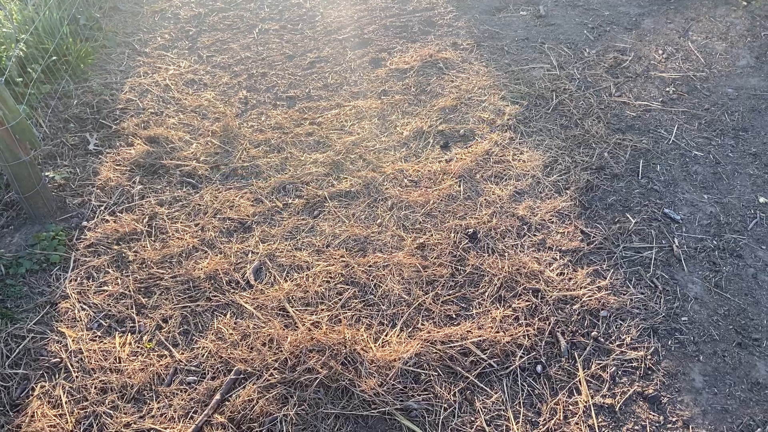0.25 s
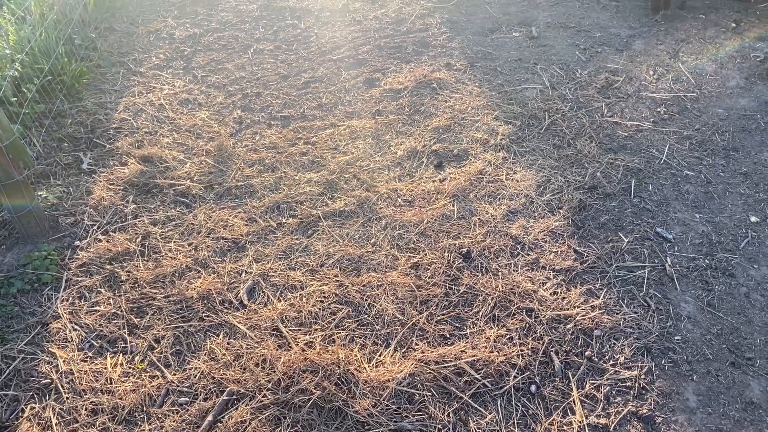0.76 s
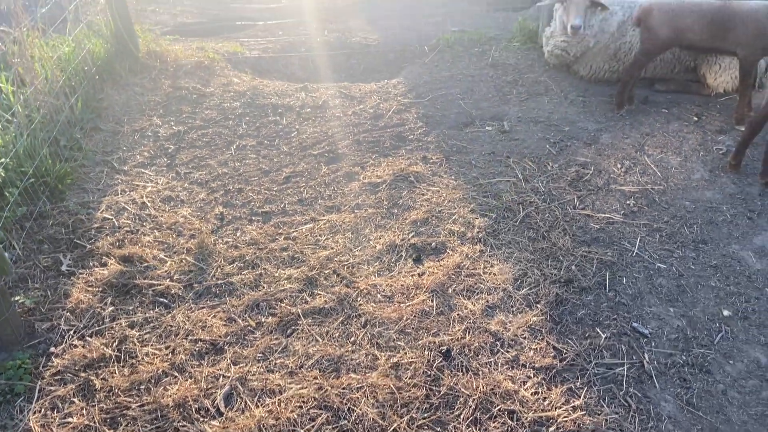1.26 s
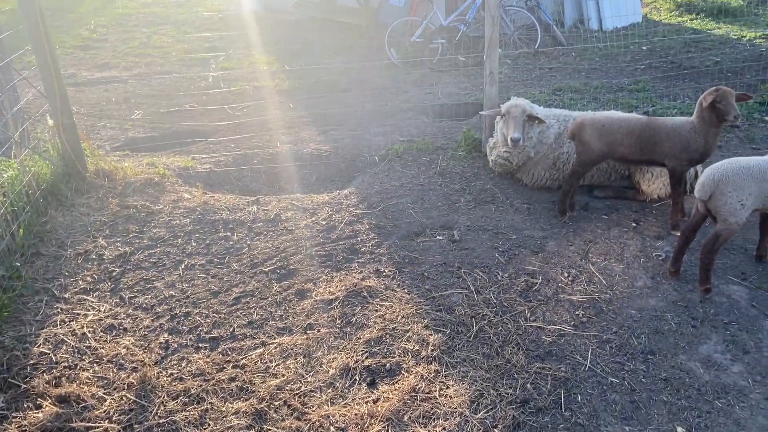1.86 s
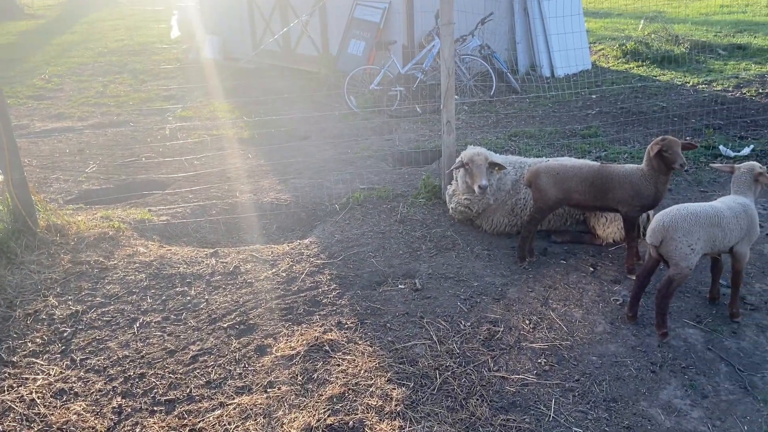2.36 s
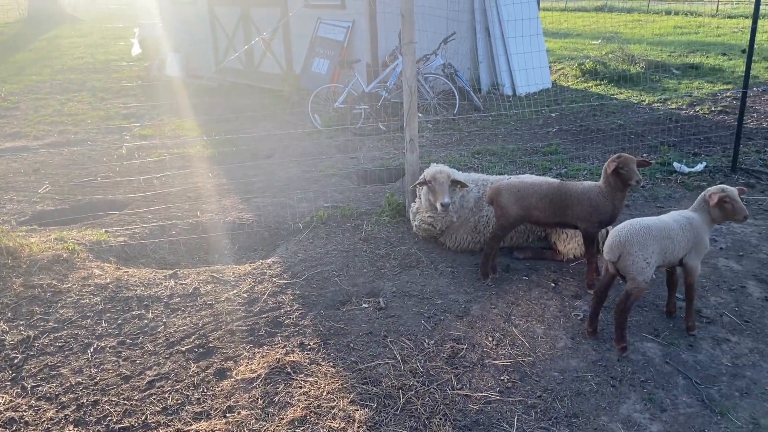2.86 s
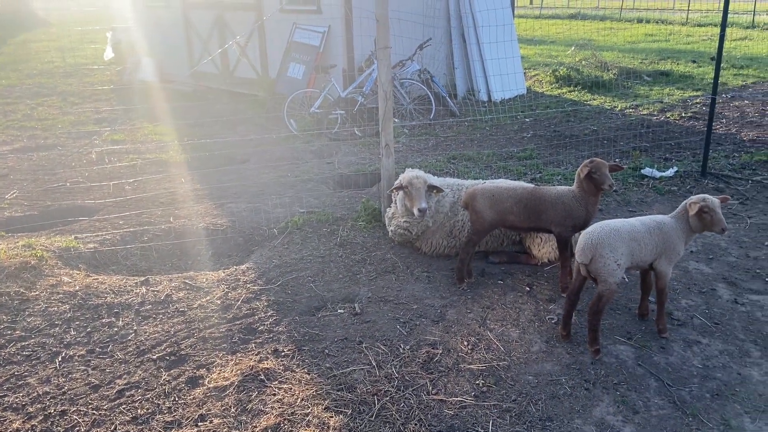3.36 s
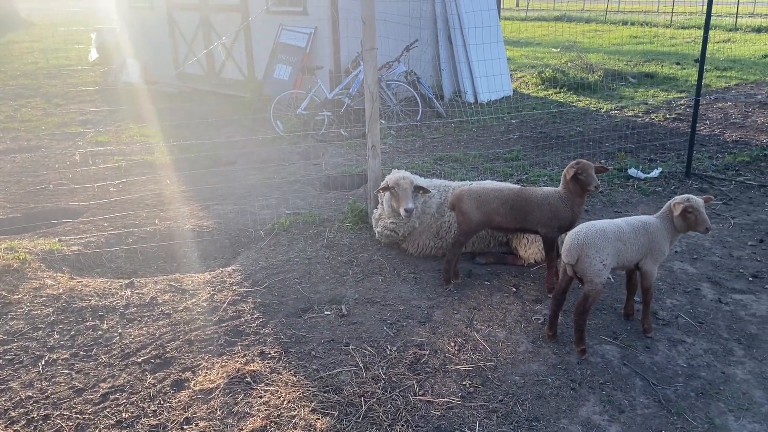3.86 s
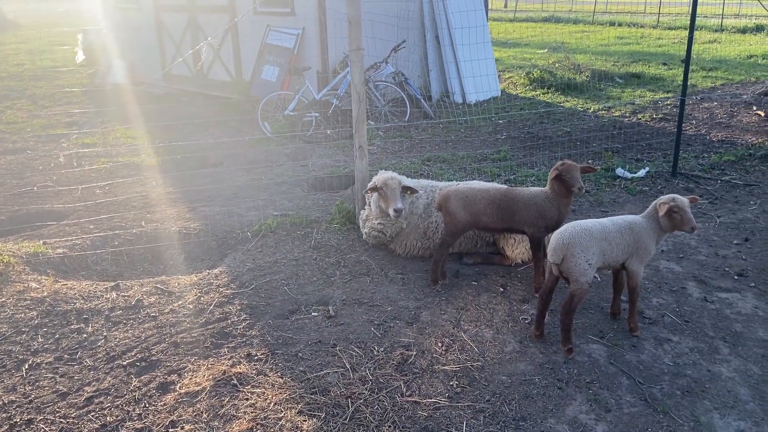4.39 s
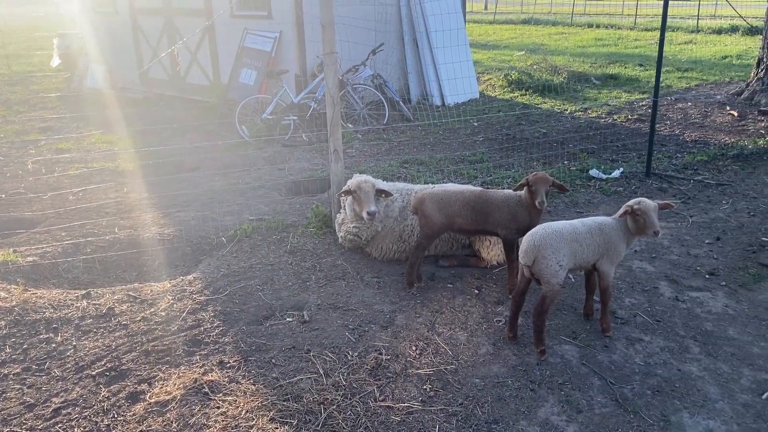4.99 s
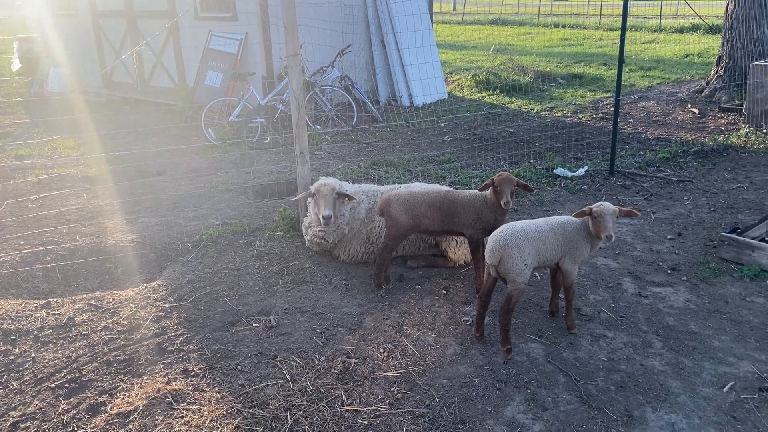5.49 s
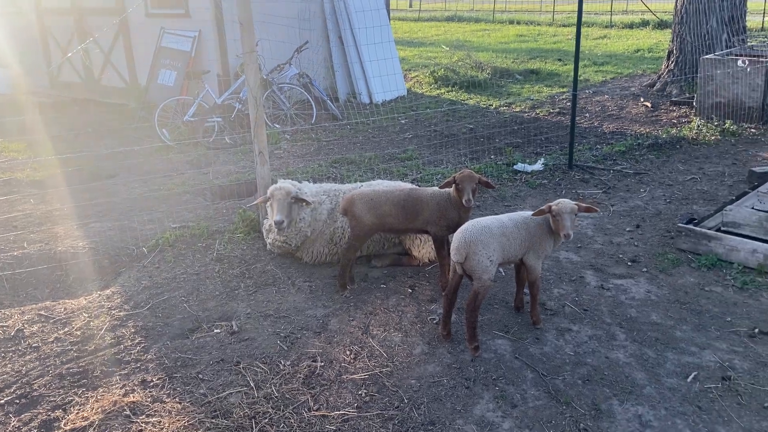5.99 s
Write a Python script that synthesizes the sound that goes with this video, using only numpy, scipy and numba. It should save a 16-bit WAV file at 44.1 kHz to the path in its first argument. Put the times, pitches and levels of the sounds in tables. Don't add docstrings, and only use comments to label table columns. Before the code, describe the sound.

Gusty low wind over faint distant hiss and tiny straw ticks, three hoarse dog barks with echoes, and finally a close, raspy, quavering sheep bleat.

```python
import sys
import numpy as np
from scipy import signal
from scipy.fft import rfft, irfft, next_fast_len
from scipy.io import wavfile
from scipy.ndimage import uniform_filter1d, minimum_filter1d
from numba import njit

SR = 44100
rng = np.random.default_rng(int(sys.argv[2]) if len(sys.argv) > 2 else 0)


def gain_from_db(level_db):
    decades = np.asarray(level_db, float) / 20
    return 10 ** decades


def waveform_to_disk(signal):
    frames = np.transpose(np.atleast_2d(signal))
    scaled = np.clip(frames, -1, 1) * 32767
    samples = np.round(scaled).astype(np.int16)
    wavfile.write(sys.argv[1], SR, samples)


N = 275090
T = np.arange(N) / SR
SIZE = next_fast_len(N)
HZ = np.arange(SIZE // 2 + 1) * SR / SIZE

# frequency in Hz, side minus mid in dB.
FIELD_SIDE = [(60, -12.5), (110, -27), (200, -20), (380, -13.5), (700, -7), (1290, -2.5), (2380, -3.5),
              (4400, -3.5), (7500, -3.5), (9000, 16.5), (10800, -10.5), (13200, -0.5), (15000, 0.5)]


def unit(x):
    return x / np.sqrt(np.mean(x ** 2))


def columns(tables):
    s, *cols = np.transpose([row for table in tables for row in table])
    inside = sum(1. * (T > table[0][0] - .001) * (T < table[-1][0] + .006) for table in tables) > 0
    return uniform_filter1d(1. * inside, size=200), [np.interp(T, s, c) for c in cols]


def curve(table):
    return np.interp(T, *np.transpose(table))


def at(table, hz):
    f, v = np.transpose(table)
    return np.interp(np.log(np.maximum(hz, 1)), np.log(f), v)


def nearest(starts, values):
    return np.asarray(values)[np.searchsorted(np.array(starts[1:]) - .1, T)].T


def bursts(rows, rise_db_s, fade_db_s):
    levels = []
    for s, hold, db, *_ in rows:
        rise = rise_db_s * np.maximum(s - T, 0)
        fade = fade_db_s * np.maximum(T - s - hold, 0)
        levels.append(db - rise - fade)
    return np.max(levels, axis=0)


def walk(rate):
    k = int(SR / rate)
    steps = np.repeat(rng.standard_normal(N // 100)[:N // k + 1], k)
    return unit(uniform_filter1d(uniform_filter1d(steps, k), k)[:N])


def band(hz, octaves):
    bell = np.exp(-.5 * (np.log2(np.maximum(HZ, 1) / hz) / octaves) ** 2)
    return unit(irfft(bell * np.exp(2j * np.pi * rng.random(len(HZ))), SIZE)[:N])


@njit
def svf(x, hz, width):
    y, b, l = np.empty(len(x)), 0., 0.
    for i in range(len(x)):
        g, k = np.tan(np.pi * hz[i] / SR), width / hz[i]
        v = (b + g * (x[i] - l)) / (1 + g * (g + k))
        b, l, y[i] = 2 * v - b, l + 2 * g * v, k * v
    return y


def ring(x, hz, width):
    return svf(x, np.full(N, 1. * hz), 1. * width)


def butter(x, order, hz, kind="low"):
    return signal.lfilter(*signal.butter(order, hz, kind, fs=SR), x)


def tract(x, modes):
    return sum((-1) ** k * gain_from_db(db) * ring(x, hz, w) for k, (hz, w, db) in enumerate(modes))


def mouth_tube(x):
    trip_s, returned = .00079, .5
    loop = np.zeros(int(trip_s * SR) + 2)
    loop[0], loop[-2:] = 1, -returned / 2
    return signal.lfilter([1.], loop, x)


def ports(x, lead, balance):
    half = gain_from_db(at(balance, HZ) / 2) * np.exp(.5j * np.interp(HZ, *np.transpose(lead)))
    return np.array([irfft(rfft(x, SIZE) * g, SIZE)[:N] for g in (half, 1 / half)])


def yard(x, t60, wet_db, top_hz):
    t = T[:SR // 2]
    tail = rng.standard_normal((2, len(t))) * np.exp(-np.log(1000) * t / t60) * np.minimum(t / 0.012, 1)
    tail = butter(tail, 1, top_hz)
    return gain_from_db(wet_db) * signal.fftconvolve(x[None], tail / np.sqrt(np.sum(tail ** 2) / 2))[:, :N]


def field():
    # time in seconds, breeze from 0 to 1.
    air = [(0, 0.2), (.9, 0), (1.2, 0.37), (3., 0.6), (5.2, 0.58), (6.0, 0.2), (6.24, 0.9)]
    # frequency in Hz, level in dB per Hz.
    hiss = [(150, -27), (250, -1.5), (370, -0.5), (450, -11), (750, -10.5), (1040, -16), (1550, -17.5),
            (4000, -28.5), (7400, -32), (9000, -48.5), (11000, -28), (14000, -45.5), (15500, -55),
            (16500, -63.5)]
    breeze = curve(air) - .7
    far_db, leaf_db = -4 * breeze, 13 * breeze
    out, swell = 0, walk(6.33)
    for hz in 250 * 2 ** np.arange(0, 6.1, 1 / 3):
        leaf_share = np.clip(np.log2(hz / 6000) / 0.22, 0, 1)
        db = at(hiss, hz) + 10 * np.log10(hz)
        db = db + (1 - leaf_share) * far_db + leaf_share * leaf_db
        db = db + 0.35 * swell + 0.52 * walk(17)
        side = gain_from_db(at(FIELD_SIDE, hz)) * band(hz, octaves=0.077)
        out = out + gain_from_db(db) * (band(hz, octaves=0.23) + side * np.array([[1], [-1]]))
    return unit(out) * gain_from_db(-39.5)


def wind():
    # time in seconds, level in dB.
    gust = [(0.0, -31.5), (0.62, -29.5), (0.69, -24.5), (0.92, -21.5), (1.01, -29), (1.16, -24),
            (1.22, -29), (1.89, -30.5), (1.94, -26.5), (2.17, -33), (2.24, -18), (2.29, -31.5),
            (2.45, -23.5), (2.95, -34), (5.26, -33.5), (5.4, -30), (6.17, -34), (6.24, -31.5)]
    # centre in
    # seconds, peak in dB, frequency in Hz.
    puffs = [(0.542, -19.5, 72.4), (0.674, -17, 212), (0.709, -11.5, 113), (0.74, -13.5, 105),
             (0.801, -15, 139), (0.845, -19, 109), (0.889, -11, 74), (1.039, -27, 94), (1.132, -13, 145),
             (1.295, -20, 220), (1.581, -21, 268), (1.935, -19, 231), (2.017, -18.5, 135), (2.082, -21, 95),
             (2.229, -21, 151.3), (2.367, -13.5, 340), (2.445, -17, 91.5), (2.453, -10, 339),
             (2.527, -18.5, 151), (3.06, -26, 77), (3.293, -31, 72.7), (5.4, -17, 172)]
    # frequency in Hz, level in dB per Hz.
    rumble = [(12, -46), (20, -41.5), (46, -4), (97, -2), (199, -2.5), (381, -22.5), (546, -15.5),
              (867, -81.5), (1200, -32.5), (1560, -66), (2640, -120)]
    gust_db = curve(gust) + 1.43 * walk(9)
    out, flutter = 0, walk(22.51)
    for hz in 38 * 2 ** np.arange(0, 4.6, .5):
        reach_db = 0.051 * (gust_db + 27.5) * np.log2(hz / 120)
        db = at(rumble, hz) + 10 * np.log10(hz) + reach_db
        db = db + 1.1 * flutter + 1.3 * walk(14)
        side_db = at(FIELD_SIDE, hz) + 6.0 + 2.4 * np.log2(hz / 120) + 1.5 * walk(6)
        side = gain_from_db(side_db) * band(hz, octaves=0.068)
        out = out + gain_from_db(db) * (band(hz, octaves=0.29) + side * np.array([[1], [-1]]))
    out = unit(out) * gain_from_db(gust_db - 3.0)
    for s, db, hz in puffs:
        t = T[:2000] - .02
        i = int((s - .012) * SR)
        puff = gain_from_db(db - 4.0) * np.exp(-(t * hz / 1.02) ** 2) * np.sin(2 * np.pi * hz * t)
        out[:, i:i + 2000] += puff[:N - i]
    return out


def straw():
    # start in seconds, peak in dB, frequency in Hz, left minus right in dB.
    ticks = [(1.1845, -48.5, 10250, -1), (1.4985, -52, 7340, 5.5), (1.72, -59.5, 7430, 14),
             (2.8486, -44, 7180, 2), (3.1884, -55.5, 7530, 13), (3.7928, -51, 7530, 8),
             (4.115, -52, 7170, 6.5), (4.961, -49.5, 11100, 1), (5.0194, -54.5, 10300, 8)]
    out, t = np.zeros((2, N)), T[:800]
    for (s, db, hz, pan_db), grit in zip(ticks, rng.standard_normal((40, 800))):
        tick = np.exp(-t / 0.0063) * svf(grit, np.full(len(t), 1. * hz), 3700.0)
        sides = gain_from_db(db + 4.0 + np.array([pan_db, -pan_db]) / 2)
        out[:, int(s * SR):int(s * SR) + 800] += np.outer(sides, tick)
    return out


def dog():
    # time in seconds, pitch in Hz, effort in dB, share of rasp from 0 to 1.
    barks = [
        [(1.588, 296, -34, 0.2), (1.598, 292, -16, 0.44), (1.614, 383, -12.5, 1), (1.634, 405, -8, 0.38),
         (1.648, 402, -3.5, 0.48), (1.66, 413.4, -4, 0), (1.685, 413, -10, 0.27), (1.715, 388, -14.5, .15),
         (1.78, 389, -32.5, 0.1)],
        [(2.222, 328, -26, .6), (2.244, 330.8, -18.5, 0.63), (2.258, 368, -17, 0.3), (2.273, 367, -10.5, 0.76),
         (2.29, 389, -17, .6), (2.304, 399, -7, 0.06), (2.325, 424, -11.5, 0.16), (2.348, 398, -23, .3),
         (2.42, 378.2, -25.5, .1)],
        [(2.798, 335, -37, 1), (2.812, 386, -23.5, 0.7), (2.83, 394, -12.5, 0.9), (2.856, 399.4, -8, 0.38),
         (2.898, 430, -10.5, 0.32), (2.915, 420, -9, 0.01), (2.932, 401.5, -7, 0), (2.947, 415, -20.5, .4),
         (3.005, 403.3, -30.5, 0)],
    ]
    # rasp in Hz, its bend in Hz per dB of effort, mouth in dB, hoarseness 0 to 1.
    bark_voice = [
        (700, 3.5, -30.5, 0.4),
        (709.6, 2, -22.5, 0.79),
        (621, -3., -25, .25),
    ]
    # time in seconds, hold in seconds, level in dB,
    # second partial in Hz, third partial in dB under it.
    falls = [
        (1.675, 0.02, -11.5, 824.5, -13),
        (2.3, 0.049, -15, 837, -6.5),
        (2.905, 0.057, -25.5, 832, -20),
    ]
    # multiple of the second partial, dB under it.
    overtones = [(2.0, -32.5), (2.5, -27.5)]
    # frequency in Hz, width in Hz, level in dB.
    muzzle = [(945, 85, -13.5), (1180, 160, 2), (1560, 170, -1), (1810, 200, -3), (2056, 200, -4.5)]
    # frequency in Hz, phase lead of the left port in rad.
    lead = [(0, 0), (400, 1.1), (560, 2.15), (1250, 2.4), (1550, 4.0), (1950, 5.7), (2450, 6.8),
            (22050, 6.8)]
    # frequency in Hz, left minus right in dB.
    balance = [(200, 0), (390, 1), (560, 5), (760, 6), (1000, 3.5), (1550, -5.5), (1950, -3), (2500, 2)]
    # delay in seconds, level in dB, left minus right in dB.
    shed = [
        (.085, -27, 2),
        (.14, -21, 0),
    ]

    gate, (hz, effort_db, share) = columns(barks)
    share = np.clip(share, .003, .97)
    rasp_hz, bend, mouth_db, rough = nearest([bark[0][0] for bark in barks], bark_voice)
    rasp_hz = rasp_hz + bend * np.clip(effort_db + 10, -12, 8)
    tone_db = effort_db + 10 * np.log10(1 - share)
    rasp_db = effort_db + 10 * np.log10(share)

    phase = 2 * np.pi * np.cumsum(hz * (1 + .03 * rough * walk(90))) / SR
    tone = gain_from_db(tone_db) * np.sin(phase) * gain_from_db(3 * rough * walk(80))

    clears, _, _, top_hz, third_db = nearest([row[0] for row in falls], falls)
    fall_hz = top_hz - 2200 * np.clip(T - clears - .02, 0, .07)
    fall = 2 * np.pi * np.cumsum(fall_hz * (1 + .035 * rough * walk(90))) / SR
    upper = np.sin(fall) + gain_from_db(third_db) * np.sin(3 * fall / 2)
    for k, db in overtones:
        upper = upper + gain_from_db(db + 1.9 * walk(70)) * np.sin(k * fall)

    wobble = 2 * np.pi * np.cumsum(rasp_hz * (1 + .025 * walk(110) + .06 * rough * walk(45))) / SR
    hoarse_hz = rasp_hz - 90 * rough
    noisy = unit(svf(svf(rng.standard_normal(N), hoarse_hz, 230.0), hoarse_hz, 280.0))
    rasp = gain_from_db((2 + 3 * rough) * walk(90)) * np.sin(wobble) + gain_from_db(8 * rough - 10) * noisy

    mixed = np.sin(wobble + phase) + 0.26 * np.sin(2 * wobble)
    mixed = mixed + 0.62 * np.sin(2 * wobble + phase) + 0.19 * np.sin(2 * wobble + 2 * phase)
    breath = rng.standard_normal(N) * (1 + 0.7 * np.sin(phase)) * (1 + 0.6 * np.sin(wobble))
    mouth = unit(tract(tract(breath, muzzle), muzzle)) + gain_from_db(-11) * mixed
    mouth = butter(mouth, 6, 2250)
    mouth = mouth + gain_from_db(-22.5) * ring(ring(breath, 4800, 900), 4800, 900)

    voice = gate * (tone + gain_from_db(rasp_db) * rasp + gain_from_db(mouth_db + rasp_db + 14.5) * mouth)
    voice = voice + gain_from_db(bursts(falls, rise_db_s=601.5, fade_db_s=398)) * upper
    far = yard(voice, t60=.25, wet_db=-24, top_hz=2000)
    out = ports(voice, lead, balance) + far
    thin = ring(voice, 1220, 350)
    for delay, db, pan_db in shed:
        out += np.outer(gain_from_db(db + np.array([pan_db, -pan_db]) / 2), np.roll(thin, int(delay * SR)))
    return out


def sheep():
    # time in seconds, pitch in Hz.
    pitch = [(5.44, 143.8), (5.59, 132.6), (5.62, 125.2), (5.665, 136.1), (5.698, 124.5), (5.785, 136.7),
             (5.83, 126.1), (5.944, 133.1), (6.06, 121.5)]
    # time in seconds, hold in seconds, level in dB.
    tremor = [(5.408, 0.02, -30.5), (5.496, 0.019, -27), (5.571, 0.041, -30.5), (5.654, 0.039, -29.5),
              (5.716, 0.008, -25), (5.758, 0.098, -27.5), (5.88, .1, -28.5), (5.992, 0.039, -28),
              (6.232, .02, -38)]
    # time in seconds, hold in seconds, level in dB.
    snaps = [(5.434, .004, -36), (5.494, .002, -34), (5.534, .003, -32.5), (5.568, 0.0048, -29),
             (5.616, .004, -27), (5.648, 0.0033, -21), (5.695, 0.00276, -22.5), (5.712, 0.045, -22),
             (5.814, 0.0054, -24.5), (5.848, 0.0015, -21.5), (5.874, 0.0045, -18), (5.93, 0.01, -21),
             (5.977, 0.022, -22.5), (6.032, .002, -28.5)]
    # time in seconds, first, second and third resonance in Hz.
    jaw = [(5.4, 777, 825, 1880), (5.54, 763, 780, 1750), (5.575, 603, 1186, 1630), (5.8, 622, 1230, 1600),
           (6.06, 570, 1176, 1640), (6.2, 796, 1031, 1610)]
    # frequency in Hz, width in Hz, level in dB.
    upper_tract = [(2204, 86, 1), (2530, 162, 7.5), (2960, 81, 4), (4010, 310, -0.5), (4800, 100, -1.5)]
    # frequency in Hz, phase lead of the left port in rad.
    lead = [(0, .3), (1250, 1), (1550, 2.2), (1950, 5.6), (2700, 6.8), (4900, 8.4), (5400, 11.3),
            (7400, 12.2)]
    # frequency in Hz, left minus right in dB.
    balance = [(300, 0), (540, 4.5), (1000, 4.5), (1550, 3.5), (2000, .5), (3800, .5), (5200, 3), (7400, 1)]

    throat_db = bursts(tremor, rise_db_s=1202, fade_db_s=1000)
    snap_db = np.maximum(bursts(snaps, rise_db_s=1003, fade_db_s=702), throat_db - 10)
    _, (first_hz, second_hz, third_hz) = columns([jaw])

    jitter = .008 * walk(130) + .008 * walk(35)
    phase = np.cumsum(curve(pitch) * (1 + jitter)) / SR
    cycle = phase.astype(int)
    since = phase % 1
    closure = np.diff(cycle, prepend=0)
    chance = rng.standard_normal((1200, 3))[cycle].T
    puff = rng.standard_normal(N) * np.exp(-since / .4)
    soft = gain_from_db(throat_db + 2.2 * chance[0]) * (closure + .045 * puff)
    sharp = gain_from_db(snap_db + 2.6 * chance[1]) * (closure + .02 * puff)
    snap = butter(mouth_tube(sharp), 2, (1900, 4600), "band")

    spit = gain_from_db(snap_db + 4 * chance[2]) * rng.standard_normal(N) * np.exp(-since / .12)
    spit = butter(spit, 2, (4800, 7800), "band")

    low = gain_from_db(3.5) * svf(svf(soft, first_hz, 176.0), first_hz, 234.0)
    low = low - gain_from_db(5.5) * svf(svf(soft, second_hz, 250.0), second_hz, 250.0)
    chest = gain_from_db(2) * ring(soft, 135, 60) + gain_from_db(-4.5) * ring(soft, 370, 210)
    chest = chest + gain_from_db(-14.5) * svf(soft + sharp, third_hz, 220.0)

    voice = gain_from_db(35.5) * (low + chest) + gain_from_db(16) * snap
    voice = voice + gain_from_db(29) * tract(sharp, upper_tract) + gain_from_db(-8.0) * spit
    voice = butter(voice, 1, 8000)
    opening = np.clip((T - 5.7) / 0.068, .15, 1)
    voice = voice + gain_from_db(3.5) * ring((sharp + soft) * opening, 11800, 500)

    crack = gain_from_db(24) * closure + rng.standard_normal(N) * np.exp(-since / .1)
    crack = butter(gain_from_db(1.4 * (snap_db + 5.5)) * crack, 1, (4800, 7000), "band")
    voice = voice + gain_from_db(-51.5) * gain_from_db(4.4 * chance[2]) * crack
    near = yard(voice, t60=.08, wet_db=-18, top_hz=4000)
    return ports(voice, lead, balance) + near


def scene():
    return field() + wind() + straw() + dog() + sheep()


def roll_off(x):
    return signal.sosfilt(signal.butter(12, 16360, fs=SR, output="sos"), x)


def record(dry):
    # low edge in Hz, high edge in Hz.
    muted = [(8500, 9600), (12450, 13900), (15200, 22050)]
    pole = np.exp(-1 / (.09 * SR))
    power = signal.lfilter([1 - pole], [1, -pole], np.mean(dry ** 2, axis=0))
    held = dry * (1 + power / gain_from_db(-30.5)) ** -.12
    room = np.minimum(.91 / (np.abs(held).max(axis=0) + 1e-9), 1)
    held = held * uniform_filter1d(minimum_filter1d(room, size=441), size=441)
    mid = rfft(held.mean(axis=0), SIZE)
    parts = [irfft(mid * (HZ > low_hz) * (HZ < high_hz), SIZE)[:N] for low_hz, high_hz in muted]
    faint = uniform_filter1d(parts[0] ** 2, size=1024) < gain_from_db(-136)
    held = held - sum(parts) * uniform_filter1d(1. * faint, size=256)
    held = irfft(rfft(held, SIZE) * (HZ < 15800), SIZE)[:, :N]
    return roll_off(held)


dry = scene()
out = record(dry)
waveform_to_disk(out)
```